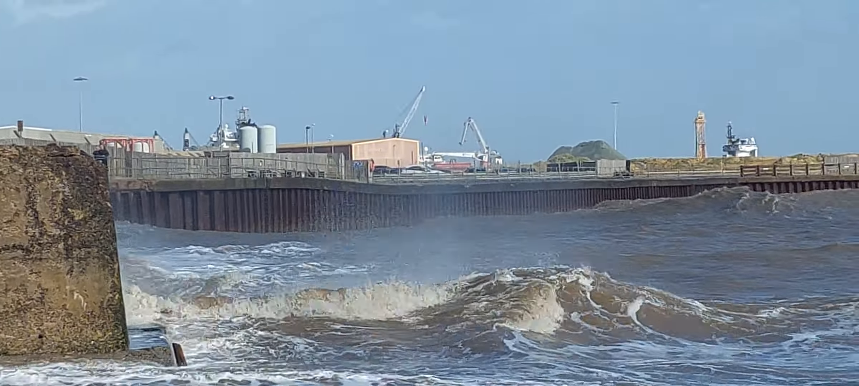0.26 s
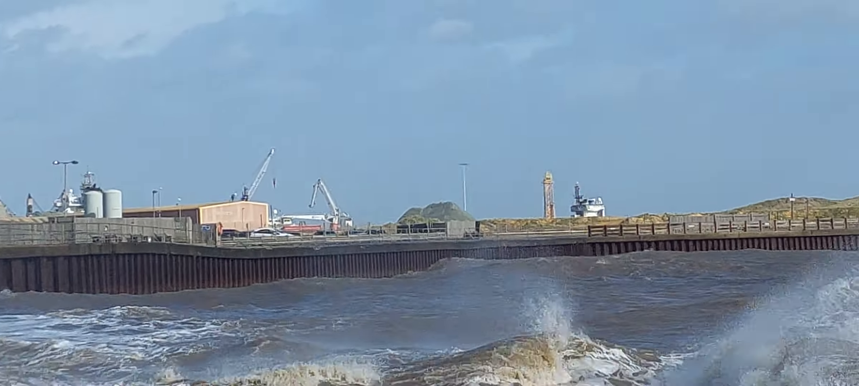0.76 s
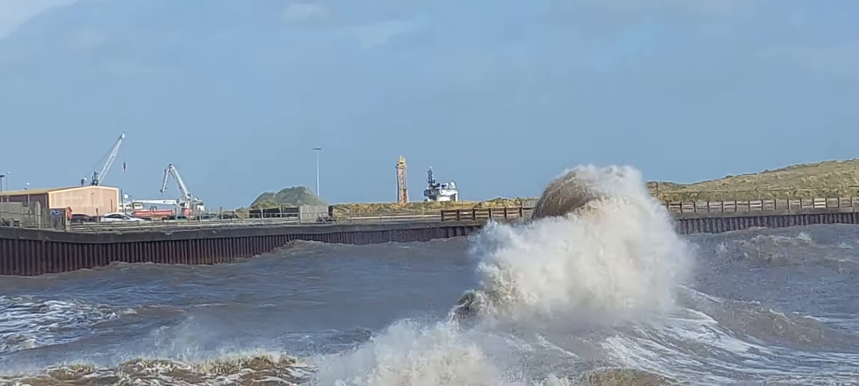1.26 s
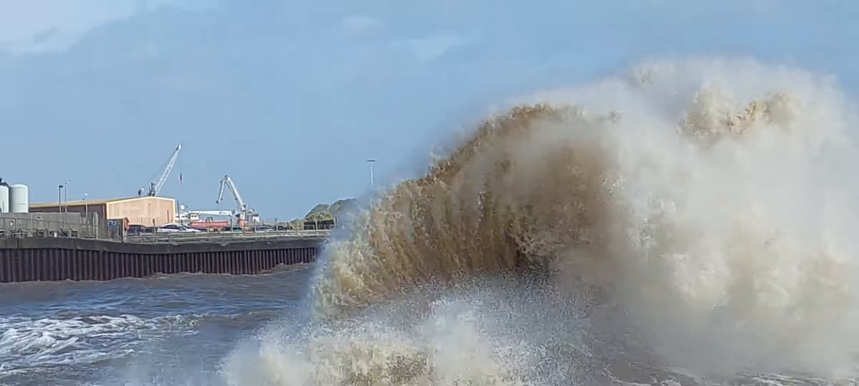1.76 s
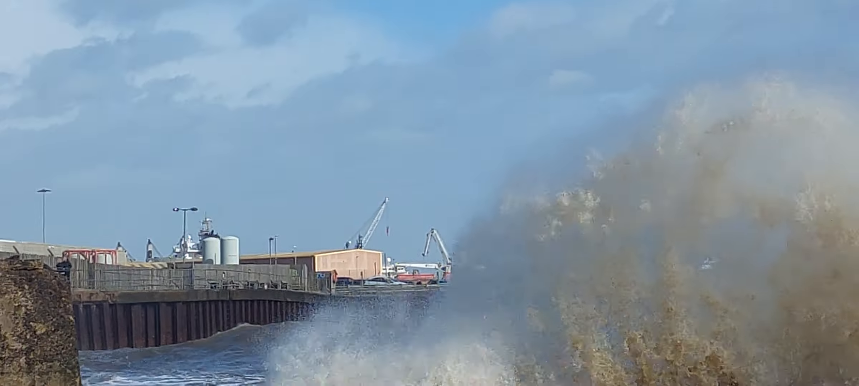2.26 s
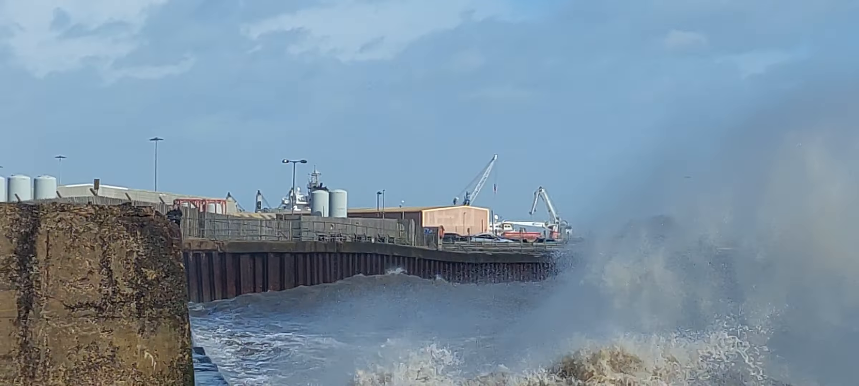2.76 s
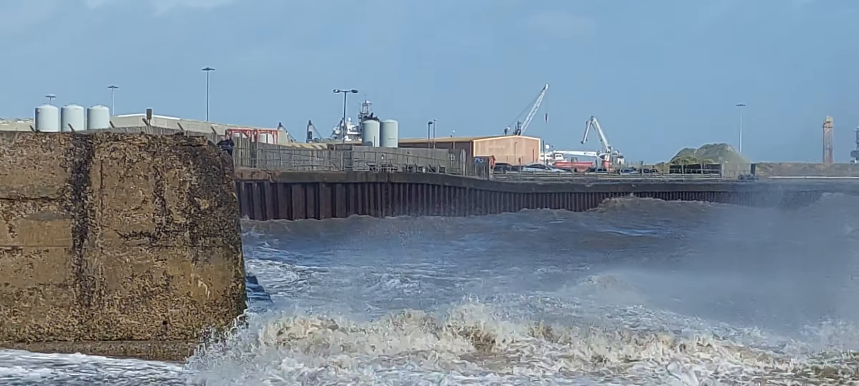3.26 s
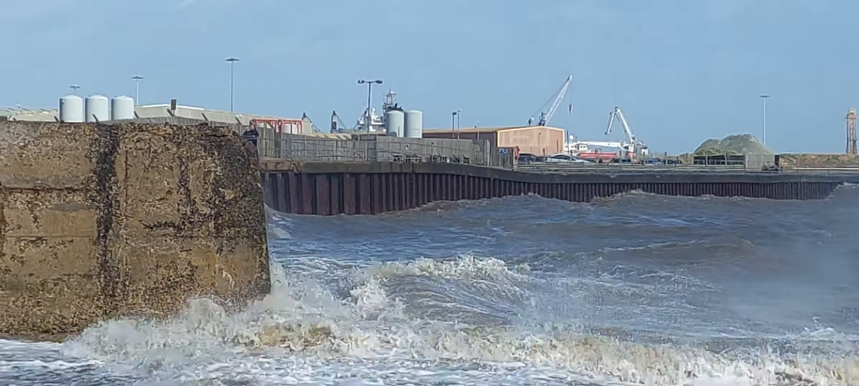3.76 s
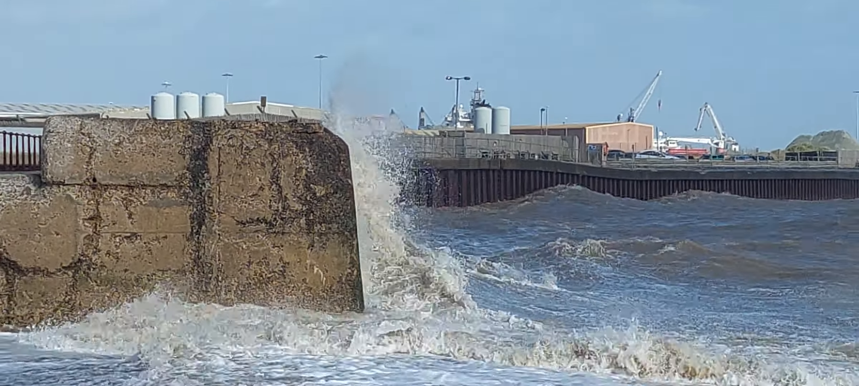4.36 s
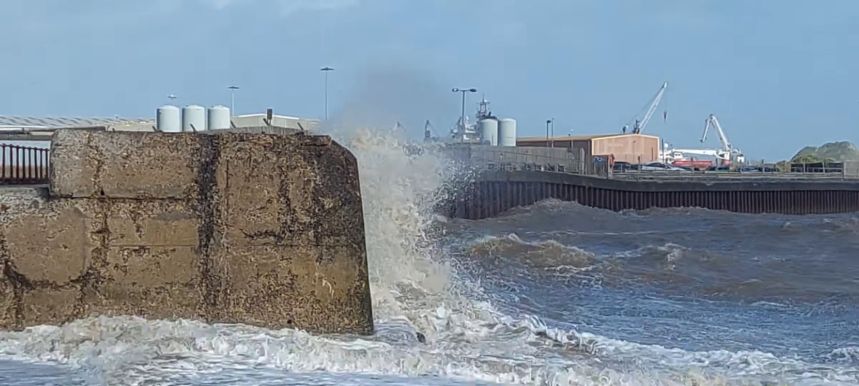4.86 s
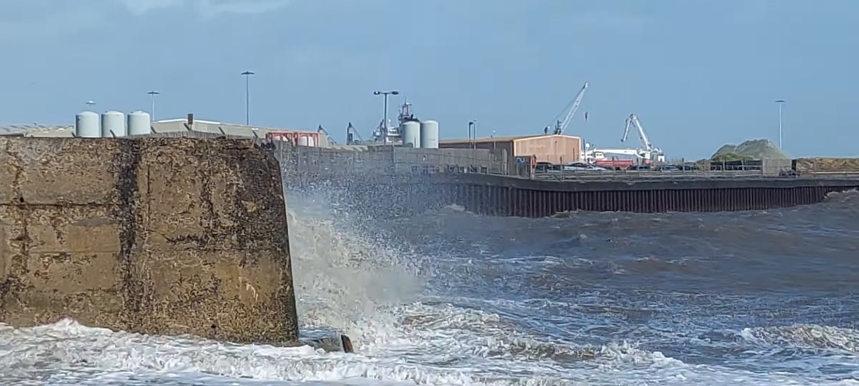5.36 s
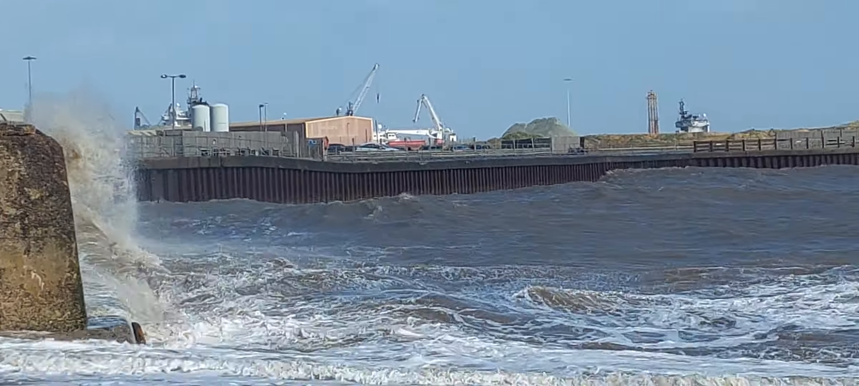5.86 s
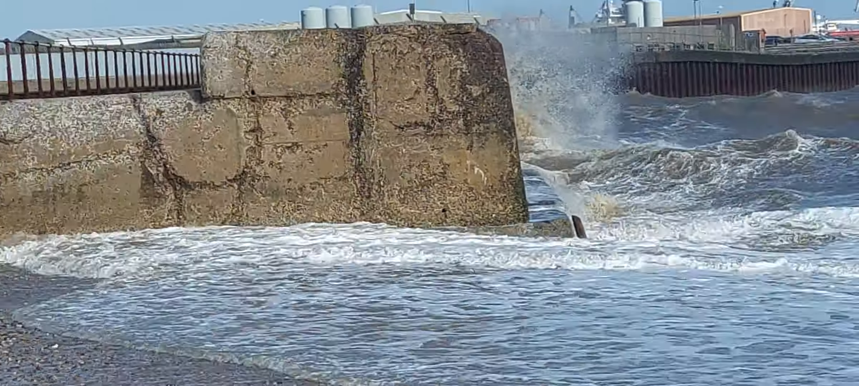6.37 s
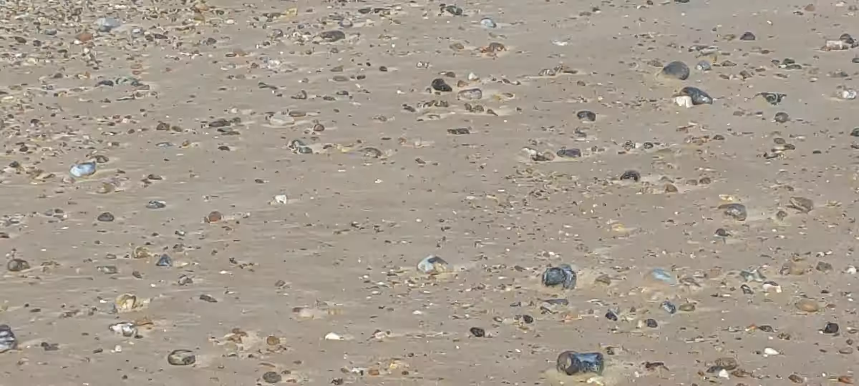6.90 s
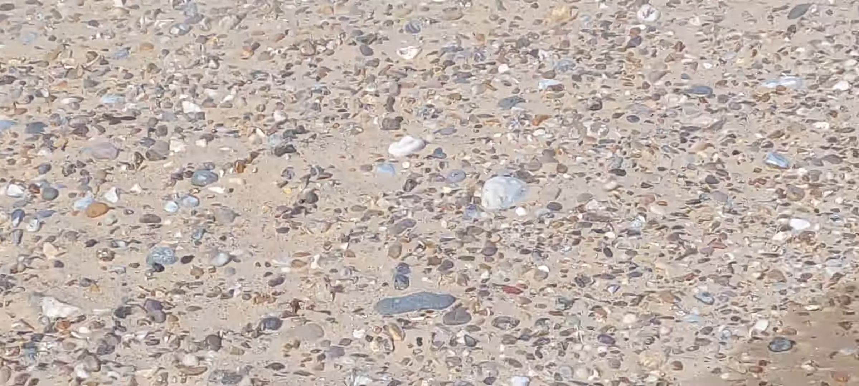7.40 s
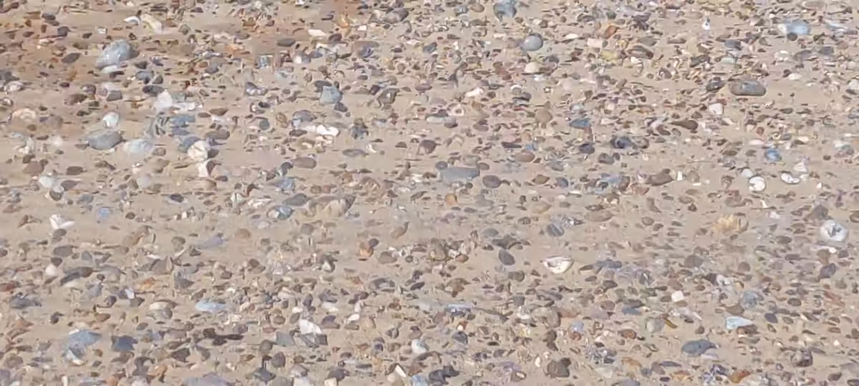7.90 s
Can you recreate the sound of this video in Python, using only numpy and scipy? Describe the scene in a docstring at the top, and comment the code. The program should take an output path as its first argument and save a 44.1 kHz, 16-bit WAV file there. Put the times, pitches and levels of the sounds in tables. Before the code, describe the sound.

A gale thumps and crackles on the microphone, with rough sea and a wave hissing over pebbles heard during a lull.

```python
"""A gale buffets two small microphone ports, with storm surf on a shingle beach by a sea wall behind it.
Swirls of air (eddies) thump, rasp and sizzle on each port: the harder the gust, the brighter it sounds.
Sharp slaps of air and heavy thuds of pressure land among the gusts.
When the wind eases, the far roar of the sea comes through and a wave hisses up the stones."""
import sys
import numpy as np
from scipy import signal
from scipy.fft import rfft, irfft, next_fast_len
from scipy.io import wavfile
from scipy.ndimage import uniform_filter1d, minimum_filter1d

SR = 44100
rng = np.random.default_rng(int(sys.argv[2]) if len(sys.argv) > 2 else 0)


def log_audio(samples):
    """Write samples as a 16-bit WAV file to the path given in sys.argv[1]."""
    # one column per channel
    frames = np.atleast_2d(samples).T
    # limit to full scale, then quantise
    limited = np.clip(frames, -1, 1)
    pcm = np.round(limited * 32767).astype(np.int16)
    wavfile.write(sys.argv[1], SR, pcm)


N = 358974


def from_db(db):
    """Turn decibels into a number to multiply by."""
    return np.exp(np.asarray(db) * (np.log(10) / 20))


def rms_one(x):
    """Scale a signal so its average strength (rms) is 1."""
    return x / np.sqrt(np.mean(x ** 2) + 1e-20)


def noise(level_db=0):
    """Separate white noise for the left and right port."""
    return rng.standard_normal((2, N)) * from_db(level_db)


def curves(rows, outside=None):
    """Join a table's rows with straight lines: one curve for each column after the time."""
    time_s, *columns = np.transpose(rows)
    return [np.interp(np.arange(N) / SR, time_s, c, left=outside, right=outside) for c in columns]


def colour(x, tone):
    """Filter a sound by a tone table; white noise keeps its strength."""
    size = next_fast_len(N)
    pitch_hz, level_db = np.transpose(tone)
    log_hz = np.log(np.arange(size // 2 + 1) * SR / size + 1)
    gain = from_db(np.interp(log_hz, np.log(pitch_hz), level_db, left=-90, right=-90))
    return irfft(rfft(x.astype(np.float32), size) * rms_one(gain).astype(np.float32), size)[..., :N]


def drift(rate_hz):
    """A smooth random wobble for each port, about 1 in size."""
    pole = np.exp(-16 * np.pi * rate_hz / SR)
    jitter = rng.standard_normal((2, N // 8 + 5001))
    smooth = signal.lfilter([1], [1, -2 * pole, pole * pole], jitter)[:, 5000:]
    return np.repeat(2.16 * np.tanh(rms_one(smooth) / 1.55), repeats=8, axis=1)[:, :N]


def sides(pan_db):
    """Share a sound between the ports; pan_db is the left level minus the right."""
    pair = from_db(np.clip(pan_db, -25, 25) * np.array([[.5], [-.5]]))
    return pair / np.sqrt(np.mean(pair ** 2, axis=0))


def spell(start_s, length_s, rise_s=0.05, fall_s=0.047):
    """Rise from 0 towards 1 and fall back; very short spells stop short of 1."""
    t = np.arange(0, N, 16) / SR - start_s
    shape = np.minimum(t / rise_s + .5, (length_s - t) / fall_s + .5)
    return np.repeat(np.clip(shape, 0, 1), repeats=16)[:N]


def clicks(per_s, spread_db):
    """Clicks at random moments, a few much louder than the rest."""
    hits = rng.random((2, N)) < per_s / SR
    level_db = spread_db * np.minimum(rng.exponential(1, hits.sum()), 4)
    out = np.zeros((2, N))
    out[hits] = from_db(level_db) * rng.choice([-1, 1], hits.sum())
    return rms_one(out)


def patchy(x, depth_db, steps, bins):
    """Make the tone flicker: random patches of time and pitch swell and sink."""
    _, _, spectrum = signal.stft(x, nperseg=256)
    patches = uniform_filter1d(rng.standard_normal(spectrum.shape), size=steps, axis=2)
    patches = uniform_filter1d(patches, size=bins, axis=1)
    gain = rms_one(from_db(depth_db * rms_one(patches)))
    return signal.istft(spectrum * gain, nperseg=256)[1][:, :N]


# How loud the wash is: time_s, level_db
WASH_LEVELS = [(4.1, -52), (4.3, -55), (5.0, -48), (5.8, -50.5), (6.1, -51), (6.4, -62)]
# Its thin tone: pitch_hz, level_db
WASH_TONE = [(1700, -5), (2050, 8), (2350, 9), (2600, -36)]


def wash():
    """A thin wash of water from straight ahead."""
    level_db = curves(WASH_LEVELS, outside=-90)[0]
    return colour(rng.standard_normal(N) * from_db(level_db), WASH_TONE)


# The wave running up the beach: time_s, level_db
SHINGLE_LEVELS = [(5.4, -81), (5.9, -45.5), (6.2, -36.5), (6.62, -36), (6.75, -80)]
# The tone of the stones: pitch_hz, level_db
SHINGLE_TONE = [(1800, 9), (2600, 7), (3300, 3), (7000, -40), (8500, -25)]


def shingle(water):
    """A wave rushes up the stones and knocks them together."""
    knocks = from_db(-6) * clicks(per_s=650, spread_db=3.5)
    level_db = curves(SHINGLE_LEVELS, outside=-90)[0] + 0.76 * drift(14)[0]
    return colour((water + knocks) * from_db(level_db), SHINGLE_TONE)


# How loud the sea is: time_s, roar_db, foam_db
SEA_LEVELS = [(0, -44, -64), (1.3, -44, -49.5), (2.0, -45, -54), (2.75, -42, -38), (3.1, -44, -51.5),
              (4.2, -40, -48), (4.8, -43.5, -48), (5.4, -39, -44.5), (6.3, -30.5, -34),
              (6.63, -26.5, -33.5), (6.7, -46, -39), (7.2, -31.5, -43), (8.14, -55, -51)]
# The tones of the far roar and of the foam: pitch_hz, level_db
ROAR_TONE = [(60, -22), (250, 6.5), (700, 0.5), (1300, 14), (2200, 1.5), (2800, -29), (5000, -8),
             (9000, -76)]
FOAM_TONE = [(2000, 12.5), (4000, 9), (7200, 4.5), (9200, -2), (12500, 5.5), (16000, 1.5)]


def sea():
    """Surf roars mostly from the right, reaching the left port later; foam hisses all around."""
    roar_db, foam_db = curves(SEA_LEVELS)
    lag, direct_share = round(0.00037 * SR), 0.88
    surf = rng.standard_normal(N + lag)
    water = np.sqrt(direct_share) * np.array([surf[:N], surf[lag:]]) + np.sqrt(1 - direct_share) * noise()
    roar = colour(water * from_db(roar_db + 0.96 * drift(17)[0]), ROAR_TONE)
    foam = colour(noise(foam_db) * from_db(0.95 * drift(39)), FOAM_TONE)
    return roar + wash() + patchy(foam + shingle(water), depth_db=1.7, steps=25, bins=5)


# Heavy thuds of pressure: start_s, level_db, pitch_hz, pan_db
THUD_HITS = [(0.285, -11, 317, -2), (0.966, -16, 120, -2), (1.405, -18, 212, 5), (2.021, -11, 245, -2),
             (2.634, -8, 144, 8), (2.765, -9, 120, 0.5), (3.184, -12, 282, -2), (3.274, -15, 144, 2),
             (3.656, -7.5, 216, 0), (4.103, -11, 147, 5), (4.249, -19, 95.5, 1.0), (4.429, -24, 99.6, 1),
             (4.661, -27, 67.3, -1), (6.581, -17.5, 149, -0.5), (6.678, -14.5, 134, -13),
             (7.241, -18, 232, 0.5), (7.602, -25, 240, 1), (7.756, -19, 280, 2.0)]


def thuds(length_s=0.026):
    """Each thud is a short, low swing of air, out of step on the two ports."""
    out = np.zeros((2, N + SR))
    t = np.arange(int(length_s * SR)) / SR
    for start_s, level_db, pitch_hz, pan_db in THUD_HITS:
        phase = rng.uniform(0, 2 * np.pi, (2, 1))
        swing = np.sin(2 * np.pi * pitch_hz * t + phase) * np.hanning(len(t))
        start = round(start_s * SR)
        out[:, start:start + len(t)] += from_db(level_db) * sides(pan_db) * swing
    return out[:, :N]


# Sharp slaps of air: start_s, level_db, pan_db
SLAP_HITS = [(0.308, -7, -6), (0.787, -6, 0), (0.864, -4.5, -2), (0.98, -7, 0), (1.029, -11, -8),
             (1.059, -5, 10), (1.092, -8, -2), (1.196, -12, 5), (1.366, -15.5, -5), (1.963, -14, 7),
             (2.004, -25, 0), (2.034, -7.5, -1), (2.158, -13, -11), (2.189, -5, 4), (2.356, -4, -4.5),
             (2.492, -10, 15), (2.613, -22, -8), (2.635, 0.5, 6), (2.778, -3, -14), (3.129, -17, -16),
             (3.635, -12, 0), (3.666, -7.5, 13), (3.781, -12.5, 5), (3.914, -6, -9), (4.047, -14, 2),
             (4.354, -30, 3), (4.604, -26, -6), (4.673, -23.5, 14), (5.367, -28, 8), (5.525, -29.5, 4),
             (6.64, -12, -4), (6.675, -5.5, 4), (6.758, -7, -2), (6.955, -1, 7), (7.04, -10.5, 3),
             (7.087, -11, -7)]
# Middle, high and very high tones of air hitting a port, in slaps and gale alike: pitch_hz, level_db
RASP_TONE = [(300, -10.5), (600, -3.5), (900, -5.5), (1150, 4), (1600, -1.5), (2300, -8.5), (3500, -24),
             (6000, -83)]
SIZZLE_TONE = [(1500, 11.5), (2800, 4.5), (4500, -2), (7000, -13), (8500, -22.5), (11000, -27)]
CRACKLE_TONE = [(6000, -4), (8000, -0.5), (10000, -1.5), (12500, 6), (16000, -3.5)]


def slaps(fade_s=0.003):
    """Each slap is a snap and a puff of air that dies away at once."""
    snaps = np.zeros((2, N))
    for start_s, level_db, pan_db in SLAP_HITS:
        snaps[:, round(start_s * SR)] = from_db(level_db) * sides(pan_db)[:, 0]
    tails = signal.lfilter([1], [1, -np.exp(-1 / (fade_s * SR))], snaps)
    air = tails * noise() + from_db(2) * snaps
    crackle = from_db(-21) * colour(snaps, CRACKLE_TONE)
    return colour(air, RASP_TONE) + from_db(-11) * colour(air, SIZZLE_TONE) + crackle


# The hollow tone of a port: pitch_hz, level_db
BOOM_TONE = [(450, -1), (650, -1), (800, 11), (950, 7), (1200, -41)]


def hollow_boom(air, hold_s=0.29, fade_db_per_s=207):
    """Air booms across the ports in the first gust, then fades."""
    level_db = -21.5 - fade_db_per_s * np.maximum(np.arange(N) / SR - hold_s, 0)
    return colour(from_db(np.maximum(level_db, -120)) * air, BOOM_TONE)


# The tones of the thumping and of the rumble below it: pitch_hz, level_db
THUMP_TONE = [(60, -20.5), (170, -4.5), (250, 2.5), (450, -4.5), (800, -10), (1500, -41)]
RUMBLE_TONE = [(20, -6), (55, 10), (130, 11.5), (200, -4), (400, -30)]


def thumping(thump_db, pan_db, eddies_db):
    """Eddies push on the ports; the deepest rumble grows less as the wind picks up."""
    pressure = rms_one(noise(0.79 * eddies_db) * from_db(3.26 * drift(25.5)))
    thump = colour(from_db(thump_db) * sides(0.031 * pan_db) * pressure, THUMP_TONE)
    return thump + colour(from_db(0.82 * thump_db - 9) * pressure, RUMBLE_TONE)


# When the wind blows straight into each port: start_s, end_s
HEAD_ON_LEFT = [(-1, 1.45), (6.67, 7.13)]
HEAD_ON_RIGHT = [(-1, 4.21), (6.67, 9)]


def head_on():
    """How squarely the wind hits each port, from 0 to 1."""
    return np.array([sum(spell(start_s, end_s - start_s) for start_s, end_s in port)
                     for port in (HEAD_ON_LEFT, HEAD_ON_RIGHT)])


# The steady wind: time_s, rasp_db, pan_db, thump_db, sizzle_over_rasp_db
STEADY_WIND = [(0, -21.5, 2, -28.5, -8.5), (.45, -15, -1.5, -24.5, -6.5), (.68, -15, -0.5, -25, -1.5),
               (1.1, -23.5, -2.5, -24.5, -9.5), (1.5, -24, -2, -26.5, -10.5), (2.1, -26.5, 0.5, -27, -12),
               (2.5, -20, -4, -22.5, -9), (3.3, -24.5, 0, -26.5, -11), (4.13, -26, -7, -27, -11.5),
               (4.25, -37.5, -1, -34.5, -11), (4.7, -44.5, -2, -39.5, -24.5), (4.82, -46, 6, -48, -18.5),
               (5.05, -51, -2, -46, -22.5), (6.45, -39, -1, -44.5, -12), (6.6, -34, -11, -33, -2),
               (6.645, -22.5, 7, -32, -2), (6.7, -20, 3, -24, -10.5), (7.15, -23.5, -7.5, -24.5, -9),
               (7.55, -30.5, -8, -27.5, -10), (8.14, -30, -12.5, -30, -6.5)]
# Gusts on top of it: start_s, length_s, rise_db, pan_db
WIND_GUSTS = [(0.054, .12, 7.5, -3), (0.29, 0.053, 6, -1), (0.854, 0.014, 5.5, 2), (1.065, 0.056, 9, 0.5),
              (1.396, 0.13, 4.5, -1), (1.761, 0.012, 9.5, -2), (1.884, 0.034, 6, 3),
              (2.053, 0.071, 3.5, -4), (2.357, 0.076, 2, 0), (2.637, 0.032, 8, 0), (2.759, 0.14, 8.5, 1.5),
              (2.959, 0.061, 4.5, 3), (3.159, 0.05, 6.5, 0), (3.459, 0.097, 7, 1), (3.636, 0.051, 7.5, 2.5),
              (3.737, 0.11, 5, 3), (3.872, 0.058, 7.5, 6), (4.094, 0.025, 8.5, 7.5),
              (4.587, 0.15, 7.5, -10), (4.99, 0.048, 12, -5), (6.66, 0.075, 7, -3.5), (6.757, 0.063, 13, 2),
              (6.883, 0.029, 3, 9), (6.95, 0.014, 12, 15), (7.094, 0.034, 7.5, 7), (7.233, 0.026, 4.5, 4),
              (7.629, 0.044, 8, 1), (7.756, 0.045, 6, 0)]
# Moments when it drops: start_s, length_s, fall_db
WIND_DROPS = [(0.77, 0.014, 10), (1.035, 0.013, 9), (1.138, 0.054, 4), (1.264, 0.089, 16),
              (1.846, 0.023, 11), (2.676, 0.053, 6.5), (2.907, 0.048, 7), (3.071, 0.061, 15),
              (3.221, 0.013, 10), (6.746, .014, 6), (6.816, 0.011, 6), (7.055, 0.019, 5.5)]


def wind_levels():
    """Gusts and drops swing the steady wind, moving the sizzle most and the thump least."""
    rasp_db, pan_db, thump_db, bright_db = curves(STEADY_WIND)
    swing_db = np.zeros(N)
    for start_s, length_s, fall_db in WIND_DROPS:
        swing_db -= fall_db * spell(start_s, length_s, rise_s=0.022, fall_s=0.022)
    for start_s, length_s, rise_db, gust_pan_db in WIND_GUSTS:
        gust = spell(start_s, length_s)
        swing_db += rise_db * gust
        pan_db += gust_pan_db * gust
    sizzle_db = rasp_db + bright_db + 1.39 * swing_db
    return rasp_db + swing_db, pan_db, thump_db + 0.66 * swing_db, sizzle_db


def gale():
    """Eddies burst on each port; the harder a burst, the brighter it sounds."""
    rasp_db, pan_db, thump_db, sizzle_db = wind_levels()
    shared = 0.41  # the part of the slow eddies that both ports feel
    slow_eddies = np.sqrt(1 - shared) * drift(41) + np.sqrt(shared) * drift(25.8)[0]
    eddies_db = 2.66 * slow_eddies + 3.72 * drift(219)
    air = rms_one(noise(eddies_db))
    facing = head_on()
    snaps = facing * clicks(per_s=110 * from_db(eddies_db), spread_db=4.5)
    rasp = colour(from_db(rasp_db) * sides(pan_db) * (air + from_db(-16) * snaps), RASP_TONE)
    # The smallest eddies add thin ticks.
    ticks_db = 1.19 * eddies_db + drift(710)
    ticks = rms_one(noise(ticks_db)) + from_db(-12) * snaps
    sizzle = colour(from_db(sizzle_db) * sides(2.6 * pan_db) * ticks, SIZZLE_TONE)
    # The highest ticks are fewer, and sound only on a port hit head-on.
    top_ticks = rms_one(noise(1.8 * ticks_db) * from_db(4.8 * drift(98))) + from_db(-7.5) * snaps
    crackle = colour(from_db(0.4 * sizzle_db - 39.5) * facing * top_ticks, CRACKLE_TONE)
    thump = thumping(thump_db, pan_db, eddies_db)
    return patchy(rasp + sizzle, depth_db=2.76, steps=7, bins=3) + hollow_boom(air) + crackle + thump


def scene():
    """Wind over the sea; the sea is turned down on a side while wind crackles there."""
    return gale() + slaps() + thuds() + sea() * from_db(-6 * head_on())


def record(dry):
    """A limiter turns each side down under the loudest gusts; then the highest treble is cut."""
    limit_db, release_db_per_s, lookahead_samples, cutoff_hz = -1.5, 305, 39, 15760
    over_db = np.maximum(20 * np.log10(np.abs(dry) + 1e-9) - limit_db, 0)
    release_db = release_db_per_s * np.arange(N) / SR
    held_db = np.maximum.accumulate(over_db + release_db, axis=1) - release_db
    early_db = -minimum_filter1d(-held_db, size=lookahead_samples)
    duck_db = uniform_filter1d(early_db, size=lookahead_samples // 2)
    treble_cut = signal.ellip(12, .3, 80, cutoff_hz, fs=SR, output="sos")
    return signal.sosfilt(treble_cut, dry * from_db(-duck_db))


dry = scene()
out = record(dry)
log_audio(out)
```